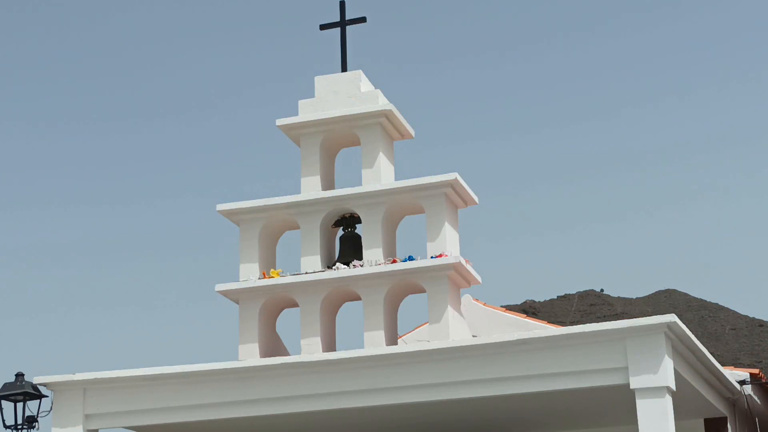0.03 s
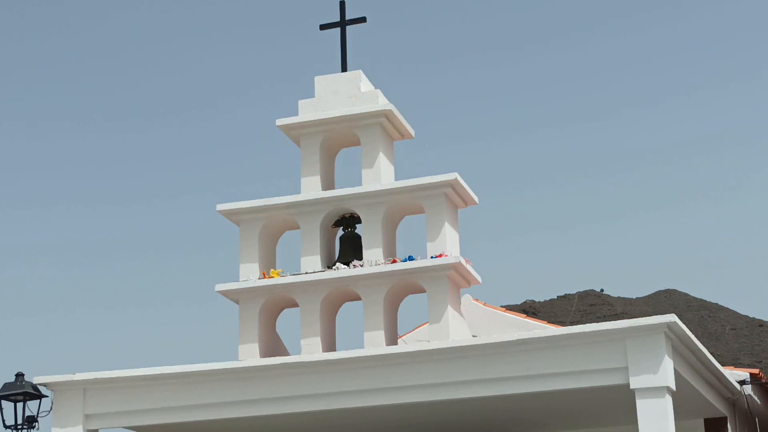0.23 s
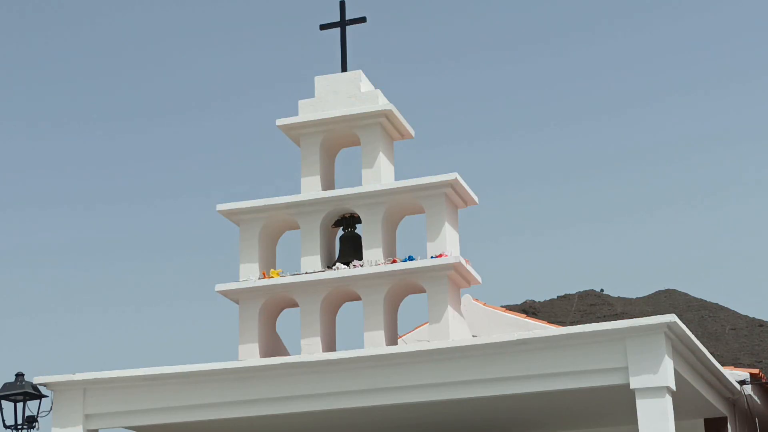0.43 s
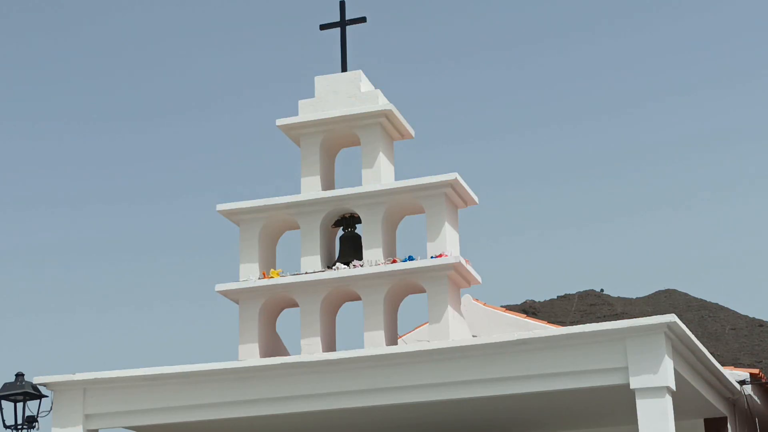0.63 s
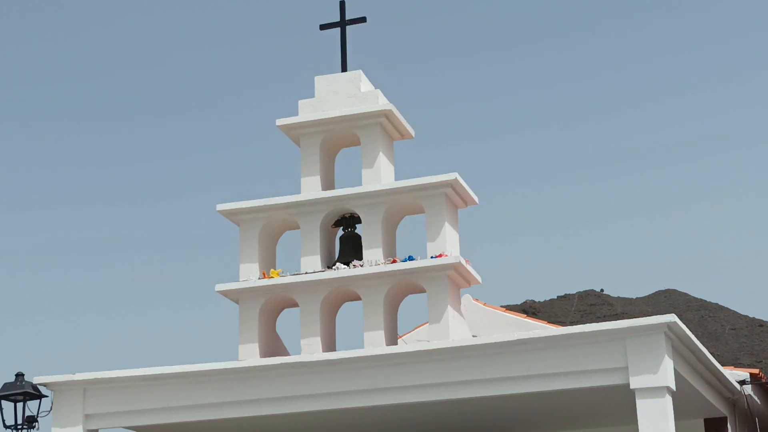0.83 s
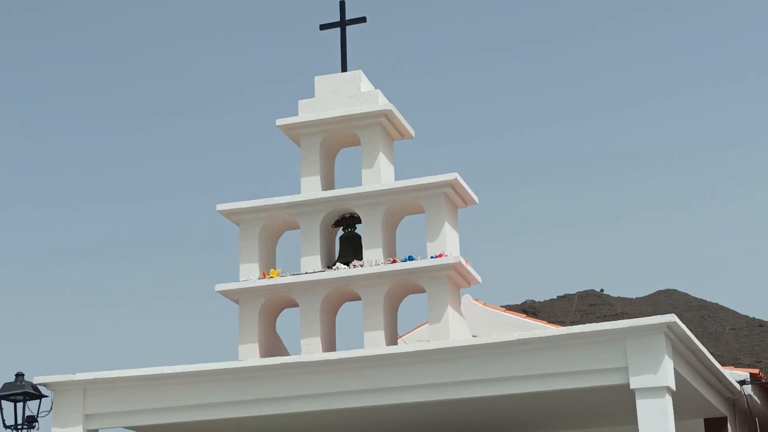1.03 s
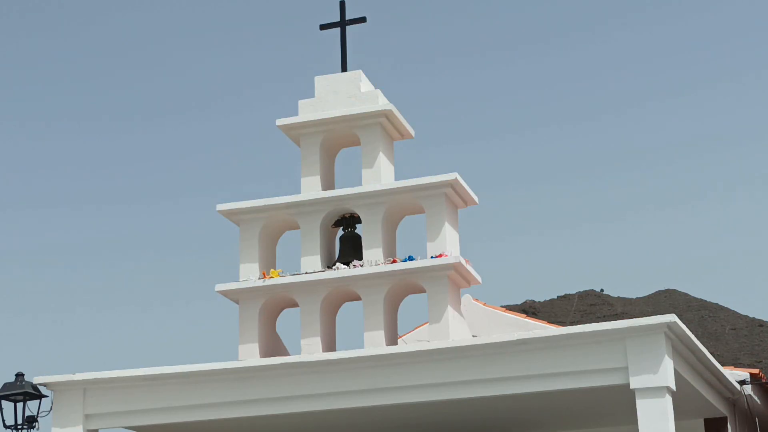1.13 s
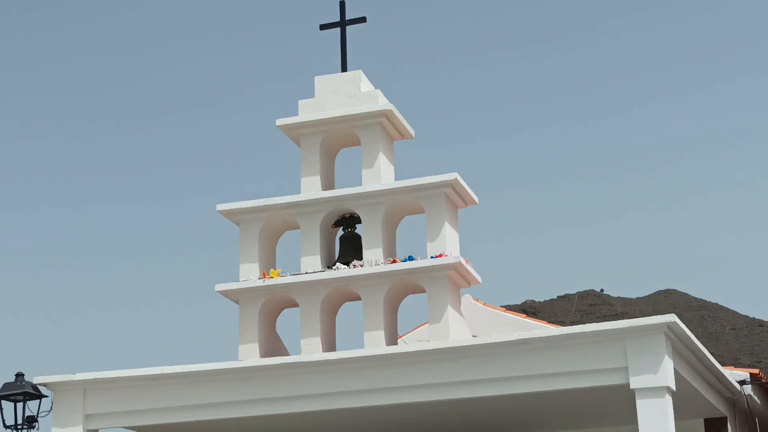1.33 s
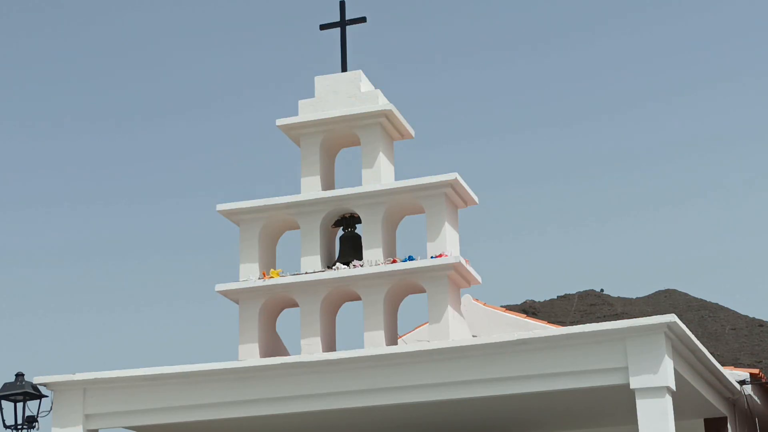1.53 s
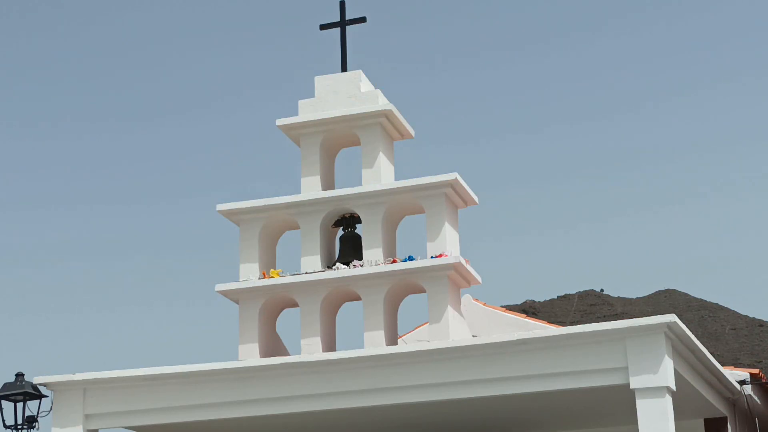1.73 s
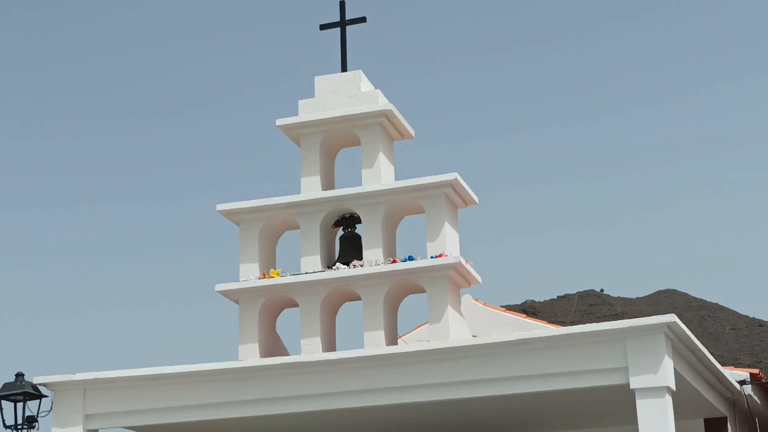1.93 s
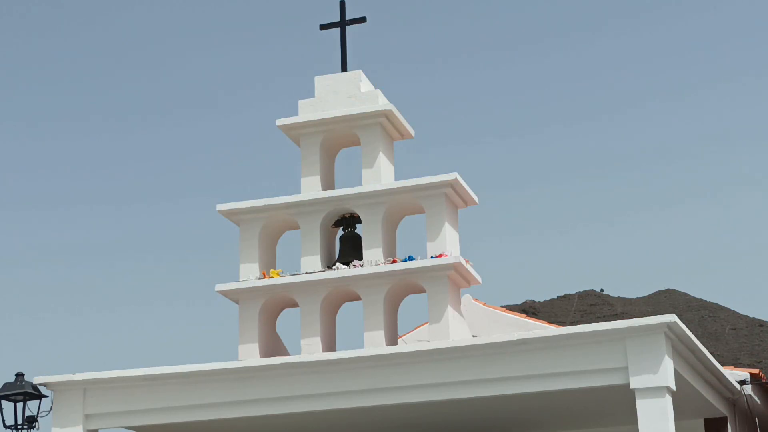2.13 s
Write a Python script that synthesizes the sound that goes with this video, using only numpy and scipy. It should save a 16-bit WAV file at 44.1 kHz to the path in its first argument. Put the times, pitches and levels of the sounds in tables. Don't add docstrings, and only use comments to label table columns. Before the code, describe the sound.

A small church bell gets one hard, bright stroke over the fading hum of an earlier one, then rings down with wavering beats; loose gear knocks, soft wind puffs, open air, close stereo microphone.

```python
import sys
import numpy as np
from scipy import signal
from scipy.fft import rfft, irfft, next_fast_len
from scipy.io import wavfile
from scipy.ndimage import uniform_filter1d, map_coordinates

SR = 44100
rng = np.random.default_rng(int(sys.argv[2]) if len(sys.argv) > 2 else 0)


def voltage_ratio(level):
    return 10 ** (np.asarray(level, float) / 20)


def output_pcm(signal):
    pcm = np.clip(np.atleast_2d(signal).T, -1, 1) * 32767
    wavfile.write(sys.argv[1], SR, np.round(pcm).astype(np.int16))


N = 97020

STRIKE_S, RISE_S = .2456, .0035
PORT_SHARE = np.array([[.5], [-.5]])


def after(start_s):
    return np.maximum(np.arange(N) / SR - start_s, 0)


def swell(u, rise_s):
    return 1 - np.exp(-(u / rise_s) ** 2)


def ring(u, hz, db, t60_s, pan_db, lead_rad):
    level = voltage_ratio(db + PORT_SHARE * pan_db - 60 * u / t60_s)
    return level * np.exp(1j * (2 * np.pi * hz * u + PORT_SHARE * lead_rad))


def beat(u, offset_hz, db, min_s):
    db, min_s = np.reshape(db, (2, 1)), np.reshape(min_s, (2, 1))
    return -voltage_ratio(db) * np.exp(2j * np.pi * offset_hz * (u - min_s))


def wobble(knots_per_s):
    knots = rng.standard_normal(int(N * 30 / SR) + 4)
    return map_coordinates(knots, [np.arange(N) * knots_per_s / SR], order=1)


def flutter(hz):
    bend = np.array([wobble(14) + 1j * wobble(14) for port in range(2)])
    return 1 + .045 * np.sqrt(hz / 1000) * bend


# frequency [Hz], peak [dB], t60 [s], left-right [dB], left lead [rad].
MAIN = [(447.1, -24.3, 28, -0.5, -0.32), (764.45, -26.1, 14.54, -1.5, -2.91),
        (1020.37, -43.5, 16.45, -3.1, 1.79), (1221.87, -25.1, 2.79, 3.2, -0.34),
        (1724.45, -6.9, 1.58, -3.3, 0.05), (1917.4, -20.0, 1.77, 2.0, -0.31),
        (1941.1, -24.4, 1.6, 1.9, -1.03), (2097.55, -21.3, 0.95, -2.3, -0.04),
        (2293.78, -18.0, 0.68, 3.3, -1.1), (2593.82, -19.0, 1.97, 8.6, -1.05),
        (2700.25, -23.9, 1.52, 11.5, 0.96), (3301.8, -26.9, 1.33, 3.3, -0.84),
        (3560.9, -7.1, 1.34, -1.0, 0.47), (4601.8, -23.8, 1.34, -7.2, -0.83)]
# frequency [Hz], peak [dB], t60 [s], left-right [dB], left lead [rad].
UPPER = [(2491.27, -32.5, 1.03, -3.0, 1.75), (3168.23, -28.6, 1.31, -1.6, 1.8),
         (3473.44, -25.2, 0.92, 6.1, -1.13), (3931.63, -42.5, 1.78, -8.8, 0.98),
         (4125.82, -32.7, 1.03, -6.8, 2.26), (4201.69, -41.9, 1.19, -8.9, -0.64),
         (4939.12, -49.1, 1.28, -3.2, 1.08), (5224.19, -39.6, 1.21, -3.6, 0.32),
         (5702.66, -34.2, 1.5, -4.1, -0.51), (6120.69, -36.5, 0.81, -11.1, -2.83),
         (6848.26, -33.7, 1.25, 2.1, -0.65), (8005.36, -42.0, 0.9, -7.9, -0.52),
         (9181.77, -54.1, 1.2, 8.6, -0.4), (10351.0, -45.0, 0.85, 19.2, 1.98)]
# offset [Hz], left [dB], right [dB], left
# and right beat minimum after the blow [s].
TWINS = [(0.45, -14, -13, 2.14, 2.08), (-1.87, -26.7, -16.7, 0.533, 0.25),
         (0.51, 16.5, 13.2, 1.401, 1.771), (2.1, -4.7, -1.7, 0.086, 0.106),
         (-0.3, 3.6, 2.0, 3.084, 3.277), (0.45, -5.8, -2.4, 1.449, 1.47),
         (-1.47, 1.5, -5.2, 0.417, 0.358), (-4.44, -10.6, -10.3, 0.097, 0.107),
         (2.19, -4.2, 3.8, 0.038, 0.003), (0.84, -4.4, -6.0, 1.133, 1.02),
         (4.99, -10.7, -10.9, 0.09, 0.186), (0.74, -5.9, -3.7, 0.021, 1.249),
         (1.65, -20.0, -17.1, 0.193, 0.199), (2.89, -2.8, -1.8, 0.011, 0.021),
         (-1.41, 8.5, -3.2, 0.125, 0.255), (1.0, -5.0, -1.5, 0.376, 0.86),
               (1.14, -0.7, 4.1, 0.009, 0.038), (-7.85, 9.5, 0.4, 0.085, 0.063),
               (1.05, 5.7, -6.0, 0.009, 0.938), (1.37, 6.6, 1.3, 0.05, 0.074),
               (1.13, 6.3, 6.3, 0.66, 0.543), (2.49, -5.3, -12.4, 0.157, 0.163),
               (0.62, -1.5, -4.7, 0.456, 1.288), (-4.92, -11.2, -7.0, 0.164, 0.023),
               (-7.95, -25.5, -0.6, 0.064, 0.099), (-0.93, 4.8, 3.0, 0.971, 0.087),
               (-7.48, -4.4, -4.3, 0.09, 0.064), (-2.66, -8.5, 4.1, 0.321, 0.292)]
# offset [Hz], left [dB], right [dB], left and right beat minimum after the blow [s].
THIRDS = [(3, -40, -40, 0.1, 0.1), (-1.38, -4.6, -8.6, 0.233, 0.066), (1.97, 10.3, 1.6, 0.298, 0.239),
          (-6.12, -9.9, 0.1, 0.089, 0.1), (-1.82, -8.2, -27.4, 0.172, 0.217),
          (-3.86, -8.4, -7.4, 0.253, 0.258), (-1.2, 6.6, 2.8, 0.812, 0.755),
          (-2.88, -2.7, -2.2, 0.334, 0.331), (4.32, -11.1, -3.7, 0.173, 0.129),
          (-3.96, -4.7, 3.0, 0.222, 0.157), (-1.35, 1.5, -4.1, 0.095, 0.04),
          (-10.12, -5.1, -6.4, 0.088, 0.078), (-0.6, -3.8, -4.0, 1.657, 1.617),
          (-1.8, -2.7, -7.1, 0.255, 0.074),
          (4.66, -3.8, -3.6, 0.069, 0.063), (1.9, 4.6, -1.7, 0.516, 0.102),
                (-4.03, -21.8, -3.6, 0.105, 0.11), (-8.27, 12.5, 1.9, 0.019, 0.003),
                (-5.72, -4.2, -9.3, 0.109, 0.022), (-5.29, 2.2, -5.2, 0.099, 0.054),
                (-5.34, 1.0, 0.3, 0.129, 0.164), (-2.99, -5.5, -8.6, 0.035, 0.044),
                (-3.02, 2.3, -6.7, 0.068, 0.331), (1.81, -14.6, -2.3, 0.072, 0.059),
                (-1.25, -3.4, 3.8, 0.751, 0.079), (-4.39, 0.1, -3.8, 0.13, 0.167),
                (-2.09, 8.8, 9.6, 0.426, 0.032), (-1.2, -0.5, -0.2, 0.026, 0.124)]
# frequency [Hz], level at the blow [dB], left-right [dB], left lead [rad], phase [cycles].
OLD_HUM = [
    (447.2, -31, -1, -0.4, 0),
    (764.4, -38.1, -7.0, 2.91, 0.99),
    (1020.8, -44.5, 6.5, 3.13, 0.77),
]


def bell():
    u, since = after(STRIKE_S), np.arange(N) / SR - STRIKE_S
    slow_rise_s = .09
    partials = MAIN + UPPER
    twins, thirds = TWINS, THIRDS
    phases = np.exp(2j * np.pi * rng.random(len(partials)))
    out = 0
    for row, twin, third, phase in zip(partials, twins, thirds, phases):
        hz = row[0]
        rise_s = slow_rise_s if hz < 1500 else RISE_S
        third_t60_s = 8 if hz < 1100 else 1.2
        group = 1 + beat(u, twin[0], twin[1:3], twin[3:])
        group = group + beat(u, third[0], third[1:3], third[3:]) * voltage_ratio(-60 * u / third_t60_s)
        out = out + phase * flutter(hz) * ring(u, *row) * group * swell(u, rise_s)
    for (hz, db, pan_db, lead_rad, cycles), phase in zip(OLD_HUM, phases):
        hum = ring(since, hz, db, 20, pan_db, lead_rad) * np.exp(2j * np.pi * cycles)
        out = out + phase * hum * (1 - swell(u, slow_rise_s))
    under = ring(since, MAIN[0][0], 0, 90, 0.6, -0.23) * beat(since, -10.15, [-44] * 2, [1.788] * 2)
    return (out + phases[0] * under).real


# frequency [Hz], peak [dB], t60 [s], left-right [dB].
WALL = [(2885.0, -28.0, 0.49, 2.0), (3398.0, -31.0, 0.93, -12.0), (3692.0, -30.0, 0.42, 0.0),
        (4452.0, -43.0, 1.31, -6.0), (4759.0, -41.0, 1.17, 8.0), (5349.0, -45.0, 1.37, 0.0),
        (6778.0, -46.0, 0.96, 3.0), (8175.0, -47.0, 0.88, 14.0), (8611.0, -46.0, 0.86, 31.0),
        (9835.0, -50.0, 0.88, 16.0), (10020.0, -54.0, 0.76, 25.0), (11514.0, -50.0, 0.62, 9.0),
        (11802.0, -57.0, 0.77, 62.0), (12398.0, -55.0, 0.5, 20.0)]
FAINT_HZ = [761, 4360, 5512, 6541, 7370, 7612, 8393, 10810, 11250, 12600, 12750, 13030, 13830, 15000]
# peak [dB], t60 [s], left-right [dB].
FAINT = [(-31.5, 0.25, -4), (-48, 0.86, 2.5), (-53, .8, -3.5), (-36.5, 0.78, -0.5), (-53, 0.98, 4.5),
         (-54.5, .6, -0.5), (-51, .7, 2), (-55, 0.94, 8), (-59.5, .7, 7.5), (-65.5, .6, 4.5), (-62, .6, 8),
         (-71.5, .6, 6), (-61, .6, 5), (-65, 0.56, 15)]
# frequency [Hz], peak [dB].
CROWD = [(2000, -44.5), (5000, -37), (7000, -53), (11500, -66.5)]


def shimmer(count=40):
    u = np.arange(SR) / SR
    scatter = rng.standard_normal((count, 3))
    hz = rng.uniform(CROWD[0][0], CROWD[-1][0], count)
    crowd_db = along(CROWD, hz) + 3.5 * scatter[:, 0]
    crowd_t60_s = .95 * voltage_ratio(1.5 * scatter[:, 1] - hz / 2500)
    crowd_pan_db = hz / 900 + 5.5 * scatter[:, 2]
    crowd = np.c_[hz, crowd_db, crowd_t60_s, crowd_pan_db]
    modes = [*WALL, *np.c_[FAINT_HZ, FAINT], *crowd]
    start, out = round(STRIKE_S * SR), np.zeros((2, N))
    for (hz, db, t60_s, pan_db), r in zip(modes, rng.random((len(modes), 4))):
        pan_db = min(pan_db, 20)
        mode = ring(u, hz, db - abs(pan_db) / 6.6, t60_s, pan_db, 2 * np.pi * r[0])
        mode = mode * (1 + beat(u, 8 * r[2], [-9, -9], [0, r[3]]))
        out[:, start:start + SR] += (mode * np.exp(2j * np.pi * r[1])).real * swell(u, RISE_S)
    return out


def along(points, hz):
    f, v = np.transpose(points)
    return np.interp(np.log(hz + 1), np.log(f + 1), v)


def noise(spectrum, alike):
    m = next_fast_len(N)
    hz = np.fft.rfftfreq(m, 1 / SR)
    angle = np.arccos(np.clip(along(alike, hz), -1, 1)) / 2
    spectra = rfft(rng.standard_normal((2, m))) * voltage_ratio(along(spectrum, hz))
    mid, side = irfft(spectra * [np.cos(angle), np.sin(angle)], m)[:, :N]
    pair = np.array([mid + side, mid - side])
    return pair / np.sqrt(np.mean(pair ** 2))


def bursts(rows):
    total = 0
    for start_s, db, rise_s, t60_s in rows:
        u = after(start_s)
        total = total + voltage_ratio(db - 60 * u / t60_s) * swell(u, rise_s)
    return total


# frequency [Hz], level [dB].
CRACK = [(60, -11.5), (300, -24), (1200, 7), (3300, 5), (7000, -7.5), (13500, -19.5), (14500, -77)]
# start [s], level [dB], rise [s], t60 [s].
SCRAPES = [
    (.2245, -50, .004, .08),
    (.68, -47, .03, .35),
    (1.483, -54, .002, .05),
    (1.575, -50, .02, .25),
]
# start [s], level [dB], rise [s], t60 [s].
KNOCKS = [
    (.2245, -40, 0.003, 0.08),
    (.247, -31, .003, .14),
    (.33, -37, .01, 0.23),
    (0.548, -34, 0.005, 0.3),
    (.58, -37, 0.004, 0.4),
    (.69, -37.5, 0.0063, 0.6),
]
# frequency [Hz], level [dB].
RATTLE = [(60, -11.5), (200, -4), (600, -2.5), (900, -15.5), (1500, -19.5), (3500, -21), (13000, -66)]
# frequency [Hz], left-right likeness [ratio].
ALIKE = [(40, .1), (150, 0.72), (400, 0.74), (1500, 0.79), (5000, 0.63), (12000, 0.13)]


def hammer():
    bright = bursts([(STRIKE_S, -18.5, .001, .053), *SCRAPES])
    return bright * voltage_ratio(PORT_SHARE * 4.9) * noise(CRACK, ALIKE) + bursts(KNOCKS) * noise(RATTLE, ALIKE)


# frequency [Hz], peak [dB].
TICK = [(1290, -45), (1860, -46), (3300, -41), (5280, -49), (7150, -58), (12400, -69)]


def tick():
    u, out = after(.2245), 0
    for hz, db in TICK:
        grain = 12 * uniform_filter1d(rng.standard_normal((2, N)), size=150)
        out = out + (1 + .5 * grain) * ring(u, hz, db, .11, 0, 0).real
    return out * swell(u, 0.00067)


# centre [s], level [dB], left-right [dB], length [s].
PUFFS = [
    (0.167, -37, 26, .04),
    (0.243, -33.5, -2, 0.013),
    (0.4, -38, 17, 0.061),
    (0.504, -34.5, 25, .02),
    (0.555, -37.5, 14.5, 0.048),
    (0.719, -36, -0.5, .03),
    (0.947, -45, -0.5, 0.033),
    (1.12, -42, -24, .03),
    (1.344, -38, 10.5, 0.023),
    (1.62, -37.5, -26, 0.033),
]
# frequency [Hz], level [dB].
PUFF = [(25, -40), (45, -12), (65, 1), (100, 2.5), (200, -11), (400, -28), (800, -63)]


def wind():
    t, gain = np.arange(N) / SR, 0
    for centre_s, db, pan_db, length_s in PUFFS:
        level = voltage_ratio(db + PORT_SHARE * pan_db - abs(pan_db) / 2)
        gain = gain + level * np.exp(-((t - centre_s) / length_s) ** 2)
    return gain * noise(PUFF, [(100, 0.0048)])


# frequency [Hz], level [dB].
AIR = [(30, -26.5), (70, -2), (150, -3.5), (350, -4.5), (900, -15.5), (2200, -17.5), (5300, -31.5),
       (6200, -36.5), (13000, -51.5)]


def air():
    level_db = -46.5 + PORT_SHARE * 2.5 + .8 * wobble(6)
    return voltage_ratio(level_db) * noise(AIR, ALIKE)


def scene():
    return bell() + shimmer() + hammer() + tick() + wind() + air()


def top_cut(x):
    return signal.sosfilt(signal.butter(12, 15480, fs=SR, output="sos"), x)


def record(dry):
    return top_cut(dry)


dry = scene()
out = record(dry)
output_pcm(out)
```